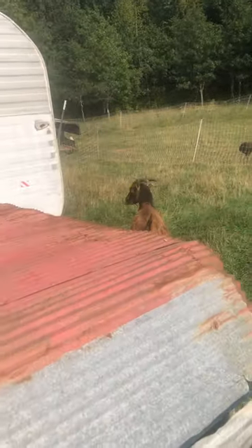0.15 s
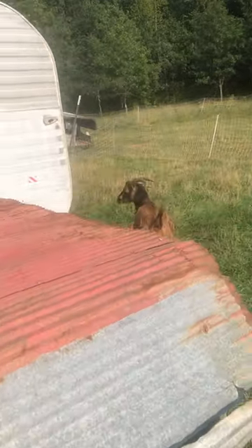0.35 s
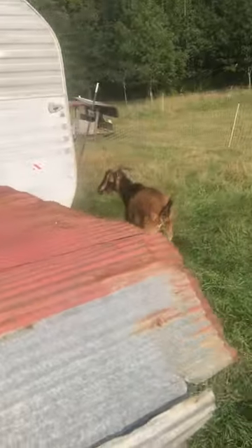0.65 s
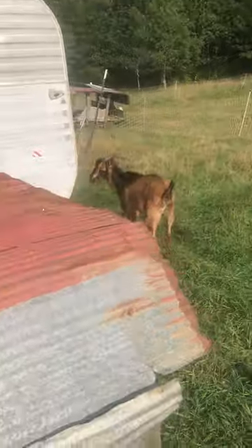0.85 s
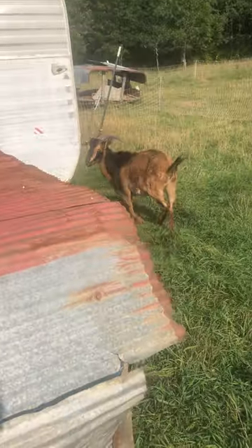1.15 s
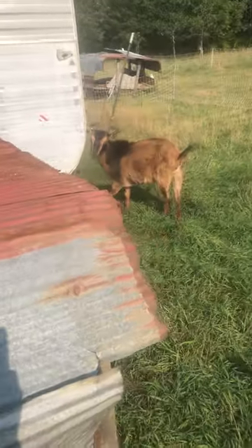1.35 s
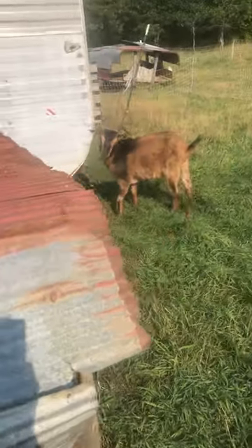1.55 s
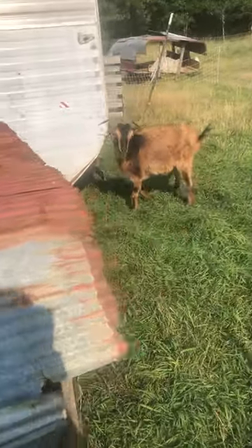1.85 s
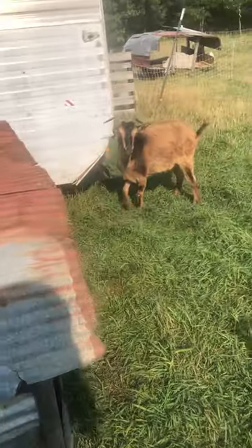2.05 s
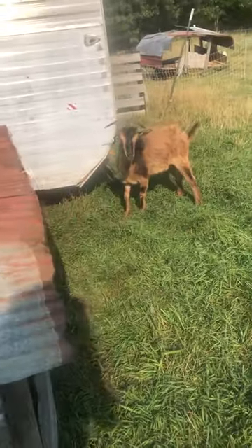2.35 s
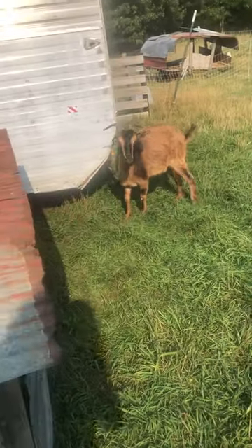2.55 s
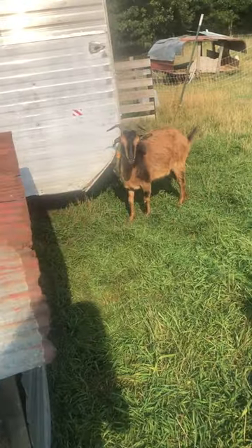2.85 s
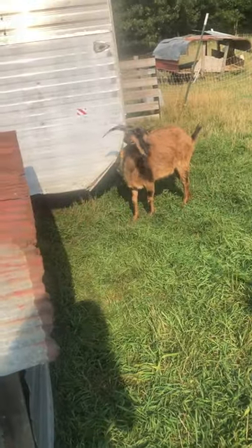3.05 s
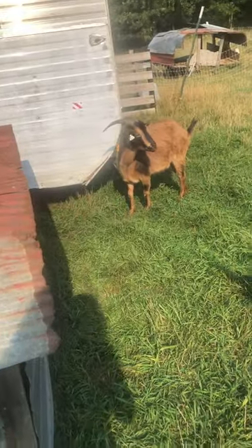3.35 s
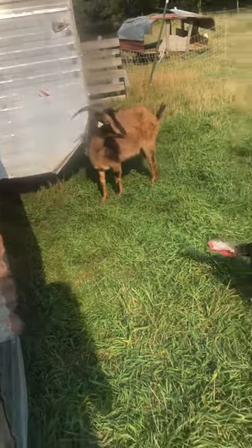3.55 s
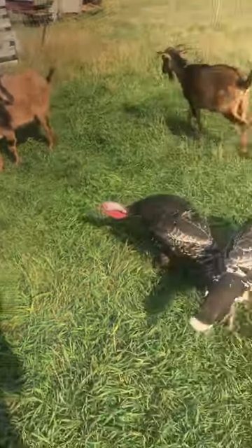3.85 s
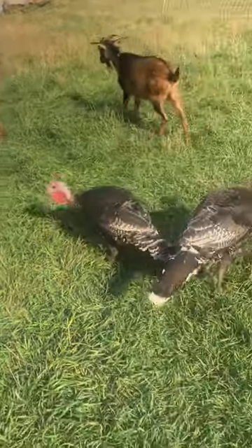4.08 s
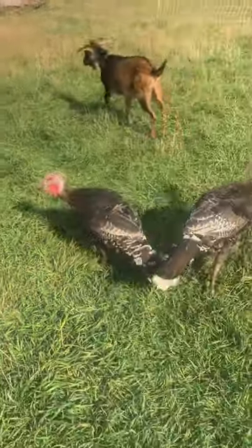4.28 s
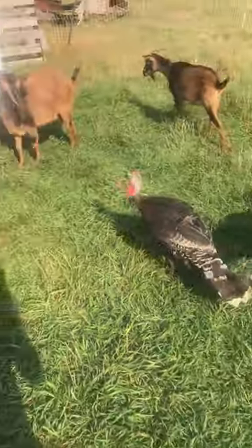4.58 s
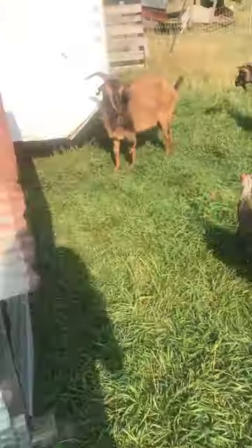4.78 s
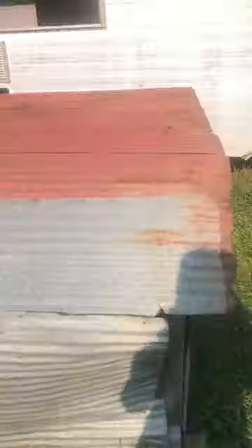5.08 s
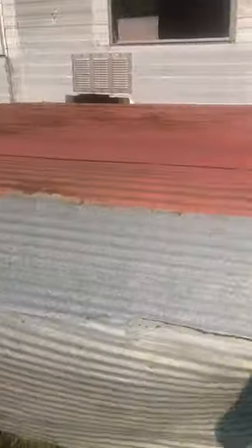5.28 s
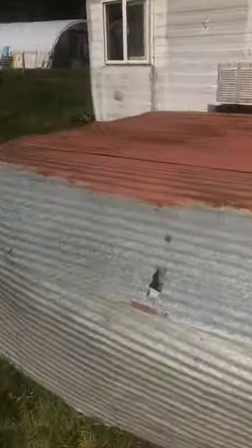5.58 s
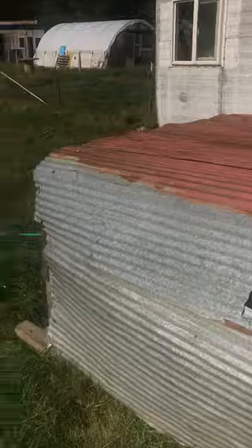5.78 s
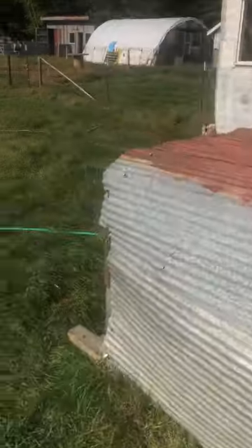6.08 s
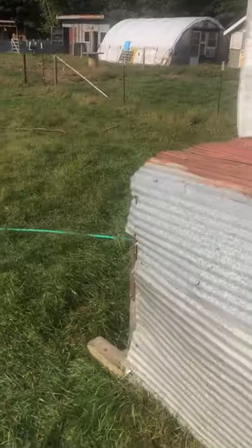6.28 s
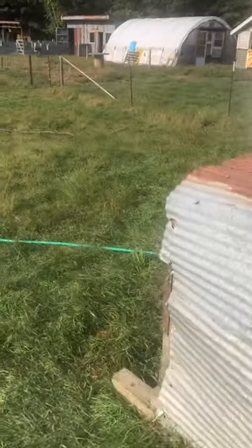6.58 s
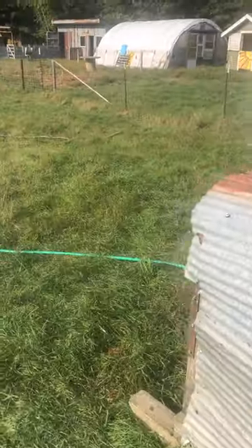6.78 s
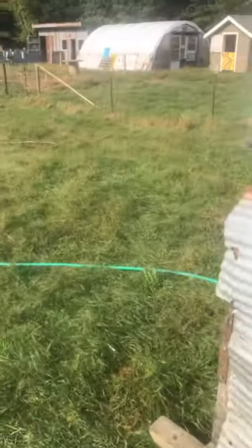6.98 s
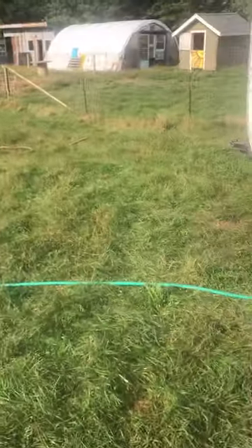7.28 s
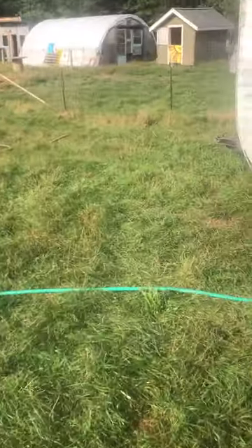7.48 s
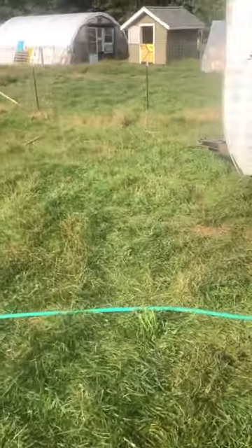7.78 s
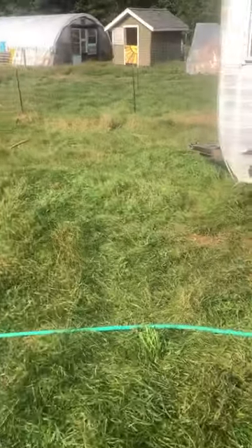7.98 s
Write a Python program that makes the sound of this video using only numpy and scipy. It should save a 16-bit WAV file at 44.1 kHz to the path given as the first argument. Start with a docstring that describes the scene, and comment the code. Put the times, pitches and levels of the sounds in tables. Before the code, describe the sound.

In an open grassy farmyard, turkeys gobble almost continuously, each call a gliding whistle, a rapid run of squeaky warbles and a falling note. Deep hollow pops drop in pitch between them. Breeze rumbles softly on a handheld microphone, insects hiss faintly, and lone yelps appear. Near the end pops grow louder, a tiny bird whistles, and fingers rub and knock sharply on the device.

```python
"""From the start turkeys gobble in turn in a grassy farmyard, over buzzing insects, a rumbling breeze and a hand
on the camera. Each gobble is a gliding whistle, a run of scooped syllables with squeaks, and a falling note.
Hollow pops plunge in pitch from half a second on; later come lone yelps, a dry rattle and a blurred far flock.
Towards the end a small bird whistles thin falling tones, while the hand rubs as shaped noise and knocks
sharply on the camera body, which rings as damped resonances."""
import sys
import numpy as np
from scipy import signal
from scipy.fft import rfft, irfft, next_fast_len
from scipy.io import wavfile
from scipy.ndimage import map_coordinates

SR = 44100
rng = np.random.default_rng(int(sys.argv[2]) if len(sys.argv) > 2 else 0)


def digitize_waveform(pressure):
    """Quantize a signal to 16-bit integers and store it at the path in sys.argv[1].

    Rows of a 2-D input are taken as channels; values are limited to [-1, 1].
    """
    field = np.atleast_2d(pressure).T
    bounded = np.clip(field, -1, 1)
    quanta = np.round(bounded * 32767).astype(np.int16)
    wavfile.write(sys.argv[1], SR, quanta)


N = 358533

# Gobbles. Each row: middle of the first syllable in seconds, length of the held note before it in seconds,
# number of syllables, syllable length in seconds, held pitch in Hz, glide as a share of that pitch,
# warble pitch in Hz, then levels in dB: held fundamental, held octave, warble fundamental, warble octave, squeak.
GOBBLE_CALLS = [(0.279, 0.076, 4, 0.039, 1149, 0.02, 927, -26.5, -35, -38.5, -50.5, -37.5),
                (0.764, 0.114, 4, 0.045, 788, -0.184, 713.6, -54, -39, -53, -38.5, -42.5),
                (1.193, 0.075, 3, 0.026, 710, 0.033, 684, -53, -36.5, -48.5, -39, -48),
                (1.266, 0.097, 4, 0.039, 993, 0.064, 1020, -44, -65, -40, -64, -45),
                (1.327, 0.16, 3, 0.026, 630, 0.081, 616, -52.5, -39.5, -46.5, -34.5, -55),
                (1.712, 0.078, 1, 0.02, 1123, 0.087, 890, -36.5, -46.5, -41.5, -49, -42.5),
                (2.196, 0.088, 4, 0.033, 711, -0.06, 692, -50.5, -36, -47, -34.5, -34),
                (2.584, 0.091, 3, 0.055, 1011, 0.058, 895, -33, -51, -42, -46, -35),
                (3.181, 0.08, 1, 0.025, 780, 0.067, 892, -29.5, -49, -36.5, -67, -62),
                (3.707, 0.036, 4, 0.036, 865, 0.0043, 904, -36.5, -45, -40.5, -56, -47),
                (3.748, 0.069, 2, 0.06, 691, 0.025, 726, -39, -41.5, -48.5, -53, -51.5),
                (4.417, 0.15, 3, 0.035, 655, 0.075, 657, -49.5, -46.5, -47.5, -39, -45),
                (4.37, 0.088, 3, 0.033, 727, -0.11, 724.4, -52, -43, -47, -41.5, -51),
                (4.642, 0.061, 2, 0.028, 867, 0.011, 866, -37, -30.5, -36.5, -30, -44),
                (5.104, 0.083, 4, 0.052, 954, -0.027, 934, -39.5, -68, -39.5, -63, -58),
                (5.612, 0.095, 4, 0.03, 686, -0.072, 689, -54, -42, -57.5, -37, -46),
                (5.929, 0.085, 3, 0.032, 941, -0.013, 896, -38, -56, -38, -45.5, -40),
                (6.106, 0.2, 2, 0.043, 994, 0.059, 956, -51, -77, -40.5, -53, -51),
                (6.547, 0.06, 3, 0.029, 1065, 0.22, 901, -40, -48, -41.5, -59, -42),
                (6.94, 0.22, 3, 0.029, 662, 0.07, 690, -56, -50, -49, -41.5, -66),
                (6.948, 0.12, 4, 0.052, 970, 0.044, 950, -46.5, -65, -44, -51, -44.5),
                (7.633, 0.15, 3, 0.031, 705, -0.08, 707, -56, -45, -48.5, -43, -46),
                (8.008, 0.1, 3, 0.029, 871, 0.027, 816, -39.5, -51, -41, -55, -44.5)]
# Lone calls with no warble. Each row: start in seconds, length in seconds, pitch in Hz,
# glide as a share of the pitch, fundamental level in dB, octave level in dB.
YELP_CALLS = [(2.699, 0.12, 734, -0.048, -47.5, -43), (6.439, 0.054, 916, 0.12, -43.5, -57),
              (3.549, 0.058, 874, -0.03, -43.5, -49), (3.849, 0.2, 1043, -0.068, -72, -53.5),
              (5.436, 0.088, 784, 0.039, -41, -47.5), (7.323, 0.033, 1220, 0.46, -37, -39),
              (7.33, 0.029, 912, 0.027, -50, -32.5)]
# Tone of the turkeys' throats. Each row: frequency in Hz, gain in dB.
THROAT_TONE = [(1450, 2.5), (1650, 2.5), (1800, 3), (2200, -7.5), (2900, -18.5), (4500, -37.5)]
# Hollow pops. Each row: time in seconds, level in dB, pitch passed at that time in Hz.
THROAT_POPS = [(0.512, -27.5, 278), (1.727, -23, 262), (2.9317, -24.5, 180), (3.224, -25.5, 340),
               (3.8715, -37.5, 274), (4.7891, -21, 320), (5.2271, -31.5, 260), (5.747, -25, 298),
               (6.283, -16, 315), (6.5663, -11.5, 312), (6.9865, -12.5, 266), (7.4752, -8.5, 267)]
# Farther turkeys join in. Each row: start in seconds, length in seconds, level in dB.
FAR_FLOCK = [(4.627, 0.31, -50.5)]
# Rubbing of the hand on the camera. Each row: time in seconds, level in dB.
GRIP_LEVEL = [(0, -46.5), (1.95, -81), (5, -69), (6.25, -45.5), (6.6, -39.5)]
# Soft dull bumps: the early ones are the upper part of wind thumps, the later ones go with the hand.
# Each row: middle in seconds, length in seconds, level in dB.
DULL_BUMPS = [(0.347, 0.18, -39.5), (0.864, 0.06, -51), (1.447, 0.064, -41), (2.557, 0.061, -41.5),
              (2.751, 0.09, -39.5), (6.348, 0.072, -35), (6.377, 0.051, -29), (6.524, 0.041, -24),
              (6.602, .06, -40), (6.89, 0.14, -39)]
# Skin slides past the microphone port. Each row: start in seconds, length in seconds, level in dB.
SKIN_BRUSHES = [(0.239, 0.16, -38.5), (7.45, 0.47, -46), (8.008, 0.25, -37)]
# Spectrum of the dull rubbing and bumps. Each row: frequency in Hz, relative density in dB per Hz.
RUB_SPECTRUM = [(50, -8), (130, 1.5), (270, 0.5), (520, -16), (1500, -22), (12000, -73)]
# Spectrum of the dry rustle. Each row: frequency in Hz, relative density in dB per Hz.
RUSTLE_SPECTRUM = [(200, 1.5), (1000, 1), (1900, 0), (3800, -20.5), (5700, -18), (8000, -30.5),
                   (13000, -48)]
# Dry patches of the rubbing. Each row: start in seconds, length in seconds, level in dB.
DRY_PATCHES = [(0.223, 0.11, -55), (6.8, 0.48, -64), (8.007, 0.41, -46)]
# Tone of the dry ticks. Each row: frequency in Hz, gain in dB.
TICK_TONE = [(800, -7), (2800, 3), (5500, 4.5), (7200, -5), (9500, -7), (13000, -31)]
# Knocks on the camera body. Each row: start in seconds, peak level in dB, brightness in Hz.
BODY_KNOCKS = [(6.278, -29.5, 900), (6.336, -29.5, 400), (6.977, -25, 1500), (7.6486, -12.5, 3560),
               (7.655, -14.5, 7000), (7.6605, -16.5, 3000), (7.745, -20.5, 11900), (7.9163, -4, 5200),
               (7.9195, -25, 2240), (7.948, -16.5, 7000), (7.952, -14.5, 2000), (8.029, -25, 3500)]
# Resonances of the camera body. Each row: frequency in Hz, width in Hz, relative level in dB.
BODY_RESONANCES = [(567, 79, 4), (950, 670, -0.5), (1437, 190, 7.5), (1940, 206, 1), (4250, 2300, -11.5)]
# Buffeting of the breeze. Each row: time in seconds, level in dB.
BREEZE_LEVEL = [(0, -43.5), (1.2, -49.5), (1.7, -44), (1.85, -69), (2.2, -65), (2.4, -42), (3.1, -44),
                (4.0, -62), (4.7, -60), (5.25, -43), (6.6, -39)]
# Single eddies thump the port. Each row: middle in seconds, length in seconds, level in dB.
EDDY_THUMPS = [(0.284, 0.068, -35), (0.475, 0.16, -38), (0.873, 0.13, -41), (1.035, 0.085, -43),
               (1.461, 0.11, -40.5), (1.735, 0.044, -38), (2.576, 0.063, -33), (2.744, 0.12, -34),
               (3.01, 0.18, -42.5), (3.682, 0.057, -44), (4.218, 0.059, -47.5), (6.066, 0.041, -35.5)]
# Spectrum of the moving air. Each row: frequency in Hz, relative density in dB per Hz.
BUFFET_SPECTRUM = [(22, -35.5), (60, 5), (110, -0.5), (220, -12), (2000, -101)]
# A small bird's falling whistles. Each row: start in seconds, length in seconds, level in dB.
BIRD_WHISTLES = [(6.21, 0.06, -56), (7.153, 0.087, -57), (7.374, 0.065, -57)]
# The bush cricket as the camera turns. Each row: time in seconds, level in dB.
CRICKET_LEVEL = [(0, -74), (2.2, -72.5), (3.5, -72.5), (5.0, -76.5), (6.2, -80.5)]
# Spectrum of the meadow's hush and insects. Each row: frequency in Hz, relative density in dB per Hz.
MEADOW_SPECTRUM = [(40, -20), (70, -1), (300, -3.5), (1100, -5.5), (1900, -8), (2600, -17.5), (4000, -23.5),
                   (5100, -17), (6800, -30.5), (8300, -17), (10500, -38.5), (16000, -36)]

BREAK_HZ = 1220  # where the voice flips into a squeak
PAUSE_S = 0.036  # end of the held note to the middle of the first syllable
BEAT_S, LAST_NOTE_LAG_S = 0.0525, 0.048  # between syllable middles; last syllable to the falling note
SQUEAK_LAG_CYCLES = 17  # after the middle of a syllable, so deeper voices break later
HELD_SQUEAK_DB = -4  # the squeak that ends the held note, against the others
FALL_DB = -11  # the falling note, against the warble
RELEASE_S = 0.005  # release of a held note
TOP_HZ = 15760  # the camera's band limit


def amp(db):
    """Turn dB into a linear gain."""
    return 10 ** (np.asarray(db) / 20)


def unit(x):
    """Bring a sound to an rms of 1."""
    return x / np.sqrt(np.mean(x ** 2) + 1e-20)


def curve(rows):
    """Draw (seconds, value) rows as one value per sample."""
    return np.interp(np.arange(N) / SR, *np.transpose(rows))


def wobble(rate, n=N):
    """A smooth random curve with rate knots a second."""
    knots = rng.standard_normal(int(n * rate / SR) + 4)
    return map_coordinates(knots, [np.arange(n) * rate / SR])


def filtered(x, response):
    """Shape x by a response given as a function of frequency."""
    m = next_fast_len(N + SR // 2)
    return irfft(rfft(x, m) * response(np.fft.rfftfreq(m, 1 / SR)), m)[:N]


def coloured(x, spectrum):
    """Shape x by (Hz, dB) points, joined on a log frequency axis."""
    hz, db = np.transpose(spectrum)
    return filtered(x, lambda f: amp(np.interp(np.log(f + 1), np.log(hz), db)))


def noise(spectrum):
    """Noise of rms 1 with a (Hz, dB) spectrum."""
    return unit(coloured(rng.standard_normal(N), spectrum))


def add(track, s, sound):
    """Mix a sound into the track from time s."""
    part = track[round(s * SR):][:len(sound)]
    part += sound[:len(part)]


def sweep(length):
    """A ramp from -1 to 1 over length seconds."""
    return np.linspace(-1, 1, int(length * SR))


def swell(v, skew=1):
    """A soft arch over a sweep; skew above 1 makes it peak late."""
    return np.abs(np.sin(np.pi * ((v + 1) / 2) ** skew))


def gobbles():
    """Each gobble is a held note, an even run of syllables with a squeak after each, and a falling note."""
    out = np.zeros(N)
    for (first, hold, count, length, held_hz, glide, low_hz,
         held_db, held_octave_db, first_db, octave_db, squeak_db) in GOBBLE_CALLS:
        beats = [first + k * BEAT_S for k in range(count)]
        squeak_lag = SQUEAK_LAG_CYCLES / low_hz
        held = held_note(hold, held_hz, glide, held_db, held_octave_db)
        fall = amp(FALL_DB) * falling_note(low_hz, first_db, octave_db)
        parts = [(first - PAUSE_S - hold / 2, held),
                 (first - BEAT_S + squeak_lag, squeak(squeak_db + HELD_SQUEAK_DB)),
                 (beats[-1] + LAST_NOTE_LAG_S, fall)]
        for beat in beats:
            middle = beat + 0.001986 * rng.standard_normal()  # loose timing
            accent = amp(1.9 * rng.standard_normal())
            parts.append((middle, accent * syllable(length, low_hz, first_db, octave_db)))
            parts.append((beat + squeak_lag, squeak(squeak_db)))
        for middle, sound in parts:
            add(out, middle - len(sound) / SR / 2, sound)
    for s, *note in YELP_CALLS:
        add(out, s, held_note(*note))
    early_turn = facing(coloured(out, THROAT_TONE))
    return facing(early_turn, at=4.33, span=0.11, bright_db=9)


def held_note(length, hz, glide, first_db, octave_db, rest_hz=790, settle=0.01183,
              hook=0.22, hook_time=0.00766, attack=0.015):
    """The voice swells as it slides from rest onto its pitch, glides, and breaks off in an upward hook."""
    v = sweep(length)
    t = np.arange(len(v)) / SR
    upturn = hook * (rest_hz / hz) ** 2 * np.exp((t - length) / hook_time)  # stronger in deep voices
    slide_in = (rest_hz - hz) * .5 * np.exp(-t / settle)
    pitch = hz * (1 + glide * v / 2 + upturn) + slide_in
    envelope = (1 - np.exp(-t / attack)) * (1 - np.exp((t - length) / RELEASE_S))
    voice = syrinx(pitch, first_db, octave_db, jitter=0.0098, shimmer_db=1.14, rasp_db=-18.0)
    return envelope / envelope.max() * voice


def syllable(length, low_hz, first_db, octave_db, dive=0.271, climb=0.363, scatter=0.017, edge_db=-5):
    """A burst scoops down and climbs by about a third of its lowest pitch, brightest at the bottom."""
    v = sweep(length * np.exp(0.1 * rng.standard_normal()))  # no two equally long
    bend = np.where(v < 0, dive, climb) * v ** 2
    scoop = low_hz * (1 + scatter * rng.standard_normal() + bend)
    envelope = np.tanh(2 * swell(v, skew=1.5) ** 1.1)
    return envelope * syrinx(scoop, first_db, octave_db + edge_db * v ** 2, jitter=0.019, shimmer_db=2.5,
                             third_db=-15.5, fourth_db=-19, rasp_db=-19)


def squeak(db, sag=0.086, arch=0.14, octave_db=-18, length=0.026):
    """A short arch of nearly pure tone around the squeak pitch, whose tail falls away."""
    v = sweep(length)
    pitch = BREAK_HZ * (1 + 0.046 * rng.standard_normal() - sag * v - arch * v ** 2)
    return swell(v, skew=0.83) * syrinx(pitch, db, db + octave_db)


def falling_note(hz, first_db, octave_db, length=0.047, drop=0.34):
    """The voice slumps as the air runs out."""
    v = sweep(length)
    return swell(v, skew=1.0) * syrinx(hz * np.exp(-drop * v), first_db, octave_db)


def syrinx(pitch, first_db, octave_db, jitter=0.023, shimmer_db=2.0,
           third_db=-15, fourth_db=-24, rasp_db=-19):
    """An unsteady whistle led by fundamental or octave; alternate cycles differ, which adds a rasp."""
    n = len(pitch)
    phase = 2 * np.pi * np.cumsum(pitch * (1 + jitter * wobble(412, n))) / SR
    # third and fourth harmonics are set against the octave
    overtones = sum(amp(db) * np.sin(k * phase) for k, db in enumerate([0, third_db, fourth_db], 2))
    rasp = 1 + 2 * amp(rasp_db) * np.sin(phase / 2)
    voice = amp(first_db) * np.sin(phase) + amp(octave_db) * overtones * rasp
    return voice * amp(shimmer_db * wobble(245, n))


def facing(x, at=0.785, span=0.12, bright_db=15, edge_hz=1950):
    """For a moment a bird points its beak at the microphone: extra treble brightens the calls."""
    aim = np.exp(-((np.arange(N) / SR - at) / span) ** 2)
    treble = filtered(x, lambda f: 1 - np.exp(-(f / edge_hz) ** 10))
    return x + amp(bright_db) * aim * treble


def pops(rise=0.0017, fall=0.0024, lead=0.0072):
    """Air let go from a tom's throat sac: a few cycles whose period grows steadily, so the pitch plunges."""
    out = np.zeros(N)
    age = np.arange(1, SR // 40) / SR
    t = age - lead  # zero at the listed time
    envelope = np.tanh(2 * age / lead) / np.cosh(t / np.where(t < 0, rise, fall) * 0.97)
    for s, db, hz in THROAT_POPS:
        phase = 2 * np.pi * hz * lead * np.log(age / lead)
        add(out, s - lead, amp(db) * np.sin(phase) * envelope)
    return out


def rattle(start=3.198, count=5, gap=0.0096, ring=0.00098, hz=1830, db=-41):
    """A few quick, dry pulses after one call, each a short burst of tone."""
    out, t = np.zeros(N), np.arange(SR // 50) / SR
    envelope = t / ring * np.exp(1 - t / ring)
    for k in range(count):
        add(out, start + k * gap, amp(db) * envelope * np.sin(2 * np.pi * hz * t))
    return out


def flock(low_hz=720, high_hz=1030, warble=0.048, count=7):
    """Several far birds warble at once, each on its own pitch; their octaves blur into one rough band."""
    out = np.zeros(N)
    for s, length, db in FAR_FLOCK:
        v = sweep(length)
        pitches = [hz * (1 + warble * wobble(70.7, len(v))) for hz in np.linspace(low_hz, high_hz, count)]
        voices = sum(np.sin(4 * np.pi * np.cumsum(pitch) / SR) for pitch in pitches)  # octaves only
        add(out, s, amp(db) * swell(v) * unit(voices))
    return out


def knocks(contact=0.0009, scrape=0.27):
    """Short gritty contacts, softened by the fingertip, ring the damped camera body."""
    out, t = np.zeros(N), np.arange(SR // 10) / SR
    f = np.fft.rfftfreq(len(t), 1 / SR)
    body = sum((-1) ** k * amp(db) * 1j * f * width / (centre ** 2 - f * f + 1j * f * width)
               for k, (centre, width, db) in enumerate(BODY_RESONANCES))
    for s, db, soft_hz in BODY_KNOCKS:
        grit = scrape * rng.standard_normal(len(t)) * np.exp(-t / contact)
        blow = (t == 0) + grit
        fingertip = 1 / (1 + 1j * f / soft_hz) ** 2
        ring = irfft(rfft(blow) * body * fingertip)[:len(t) // 2]
        add(out, s, amp(db) * ring / np.abs(ring).max())
    return out


def handling(lumps_db=7, grain_db=3.5, dry_db=-17):
    """The hand rubs dully on the case with a soft dry rustle and brushes past the port; dull bumps join in."""
    dull_level = amp(curve(GRIP_LEVEL))
    rustle_level = amp(dry_db) * dull_level  # taken before the bumps are added
    for s, length, db in DULL_BUMPS:
        add(dull_level, s - length / 2, amp(db) * swell(sweep(length)))
    for s, length, db in SKIN_BRUSHES:
        add(rustle_level, s, amp(db) * swell(sweep(length), skew=0.35) ** 2)
    dull = unit(noise(RUB_SPECTRUM) * amp(lumps_db * np.tanh(wobble(60))))
    rustle = unit(noise(RUSTLE_SPECTRUM) * amp(grain_db * wobble(300)))
    return dull_level * dull + rustle_level * rustle


def crackle(ticks_per_s=5000):
    """Dry skin catches on the case in tiny random ticks."""
    level = np.zeros(N)
    for s, length, db in DRY_PATCHES:
        add(level, s, amp(db) * swell(sweep(length)))
    ticks = rng.standard_normal(N) * (rng.random(N) < ticks_per_s / SR)
    return level * unit(coloured(ticks, TICK_TONE))


def songbird(from_hz=3080, to_hz=2380):
    """Thin, slightly hoarse whistles from the trees, each a tone falling in pitch."""
    out = np.zeros(N)
    for s, length, db in BIRD_WHISTLES:
        v = sweep(length)
        pitch = np.linspace(from_hz, to_hz, len(v)) * (1 + 0.0089 * wobble(500, len(v)))
        level = amp(db + 2.4 * wobble(117, len(v))) * swell(v)
        add(out, s, level * np.sin(2 * np.pi * np.cumsum(pitch) / SR))
    return out


def breeze(lumps_db=2.5):
    """Eddies buffet the microphone port; the biggest arrive as separate soft thumps."""
    buffeting = unit(noise(BUFFET_SPECTRUM) * amp(lumps_db * np.tanh(wobble(20))))
    out = amp(curve(BREEZE_LEVEL)) * buffeting
    air = noise(BUFFET_SPECTRUM)
    for s, length, db in EDDY_THUMPS:
        v = sweep(length)
        eddy = swell(v) * air[round(s * SR):][:len(v)]
        add(out, s - length / 2, amp(db) * unit(eddy))
    return out


def meadow(air_db=-54):
    """Distant hush and insect chorus; a nearer bush cricket's wing strokes each slide down in pitch."""
    strokes_hz, duty = 17.8, 0.8  # wing strokes a second, sounding share of each
    centre_hz, slide_hz, grain_hz = 8150, 880, 110
    beat = np.cumsum(strokes_hz * (1 + 0.031 * wobble(2))) / SR % 1
    stroke = np.minimum(beat / duty, 1)
    pitch = centre_hz + slide_hz * np.cos(np.pi * stroke) + grain_hz * wobble(900)
    level = np.sqrt(swell(2 * stroke - 1, skew=0.6)) * amp(2 * wobble(120))
    cricket = level * np.sin(2 * np.pi * np.cumsum(pitch) / SR)
    hush = amp(air_db + 0.36 * wobble(3.74)) * noise(MEADOW_SPECTRUM)
    return hush + amp(curve(CRICKET_LEVEL)) * unit(cricket)


def yard(x, t60=0.16, wet_db=-15):
    """Sheds and the tree line scatter a faint answer: a decaying noise tail."""
    t = np.arange(SR) / SR
    tail = rng.standard_normal(SR) * amp(-60 * t / t60) * (t > .008)  # starts after 8 ms
    return x + amp(wet_db) * signal.fftconvolve(x, tail / np.linalg.norm(tail))[:N]


def scene():
    """Turkeys in the yard, the meadow behind them, wind and a hand on the camera."""
    animals = yard(gobbles() + rattle() + flock() + songbird())
    hand = knocks() + handling() + crackle()
    return (animals + pops() + hand + breeze() + meadow())[None]


def record(dry):
    """The camera keeps nothing above its band limit."""
    return filtered(dry[0], lambda hz: hz < TOP_HZ)[None]


dry = scene()
out = record(dry)
digitize_waveform(out)
```